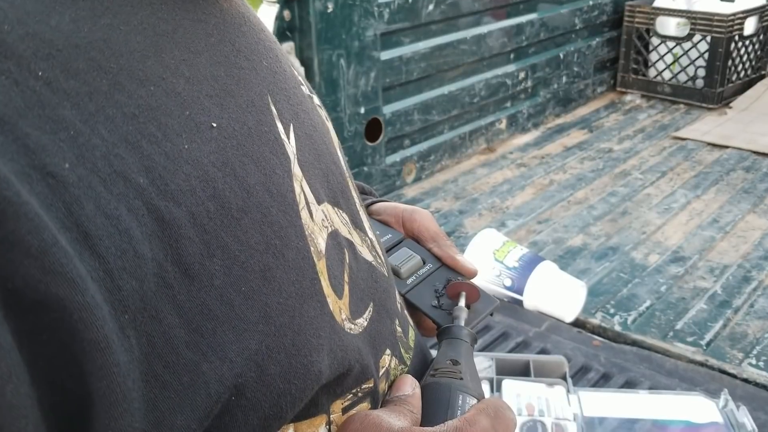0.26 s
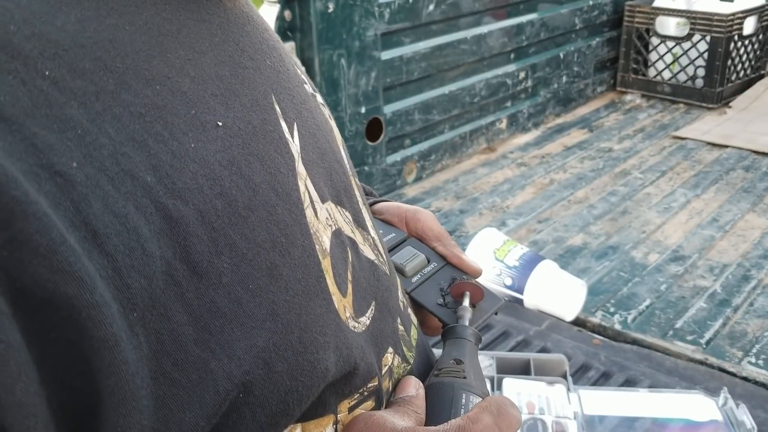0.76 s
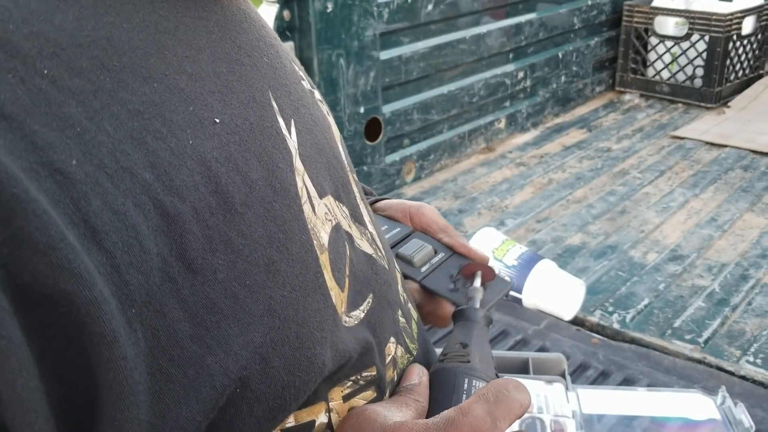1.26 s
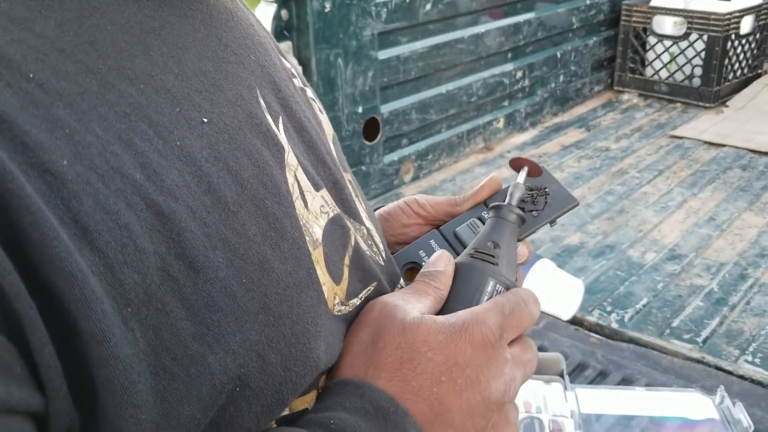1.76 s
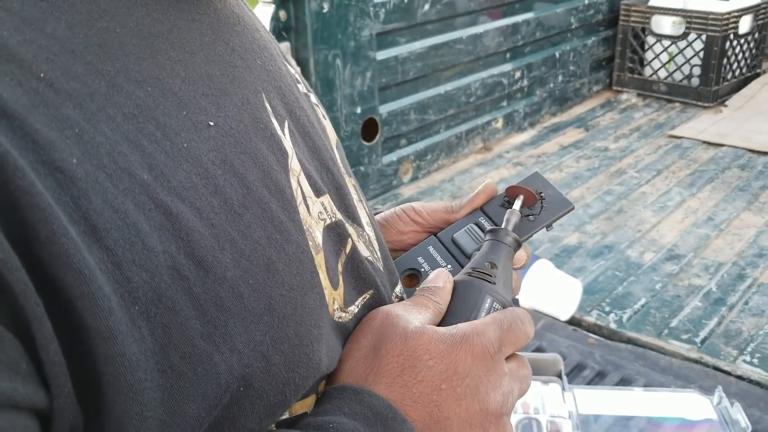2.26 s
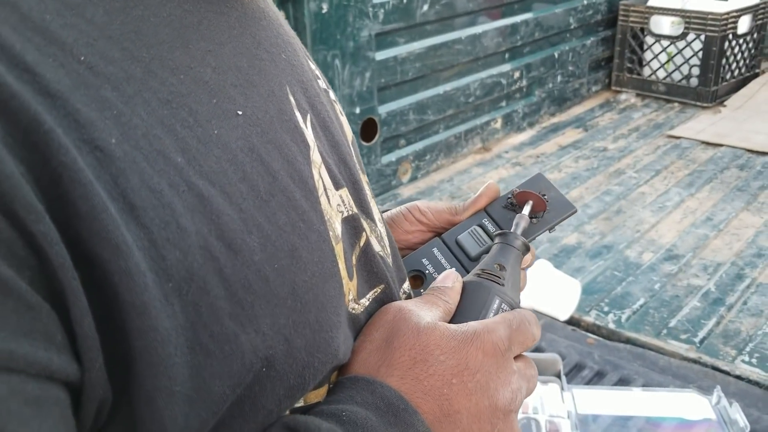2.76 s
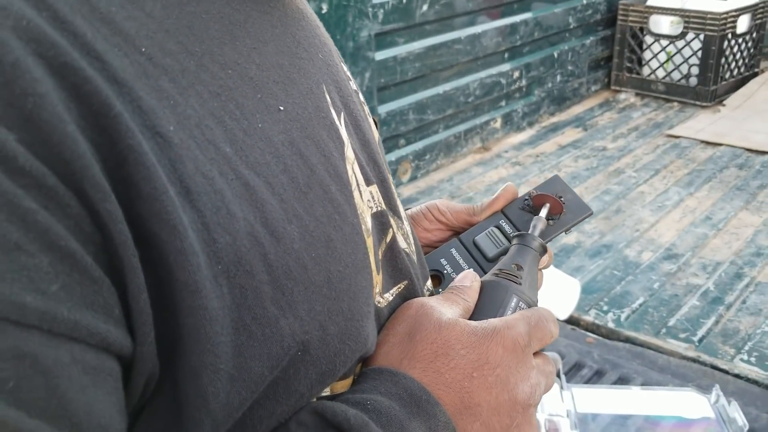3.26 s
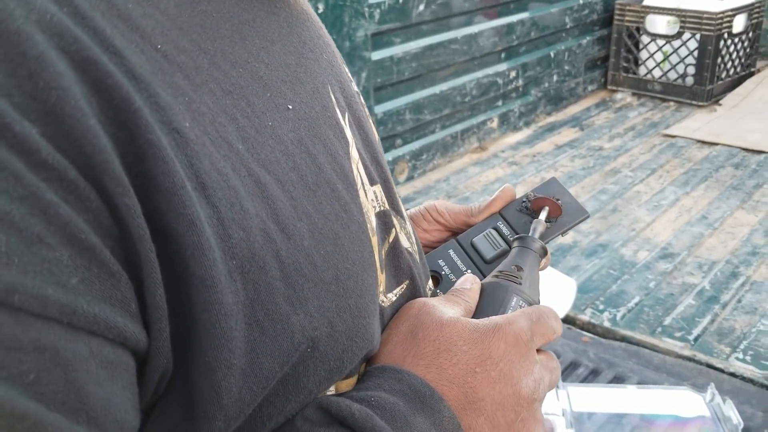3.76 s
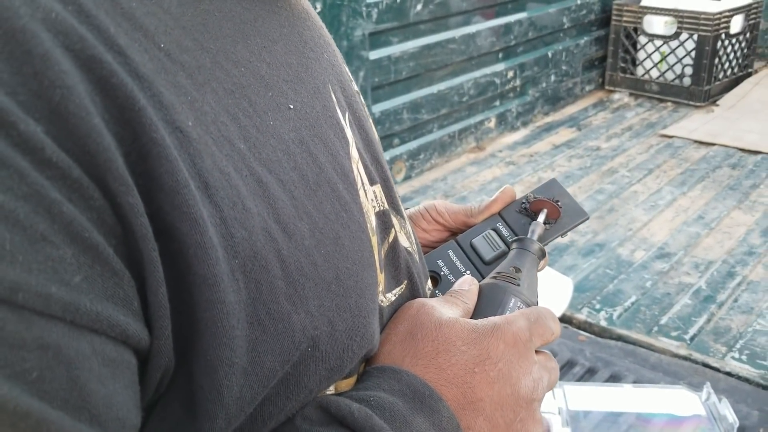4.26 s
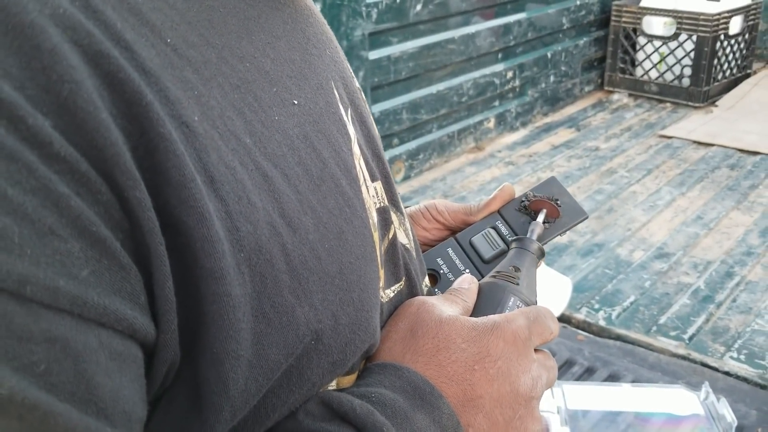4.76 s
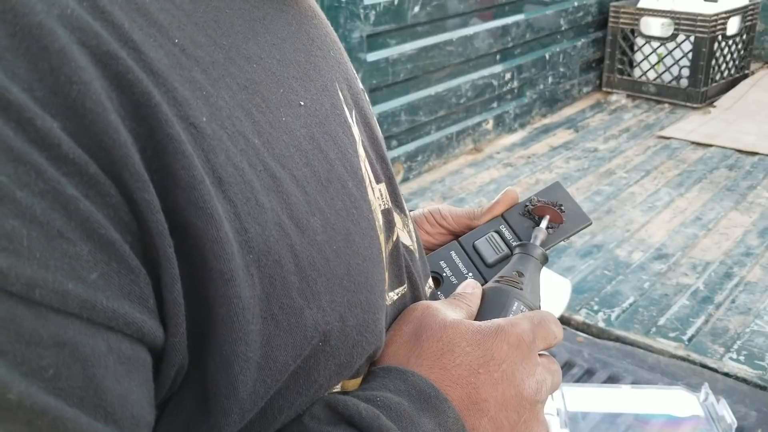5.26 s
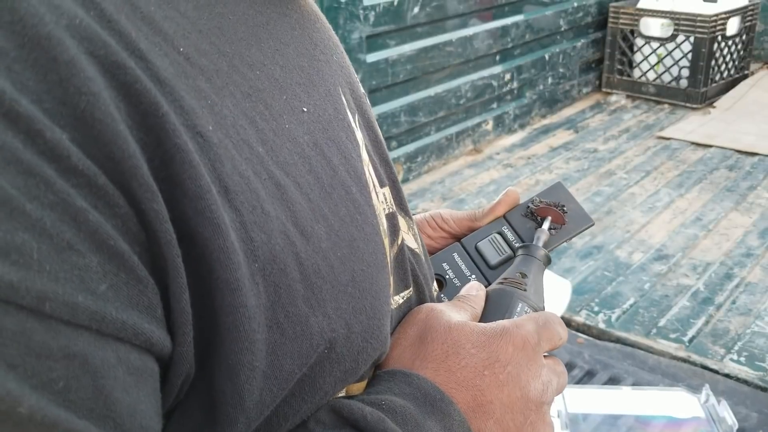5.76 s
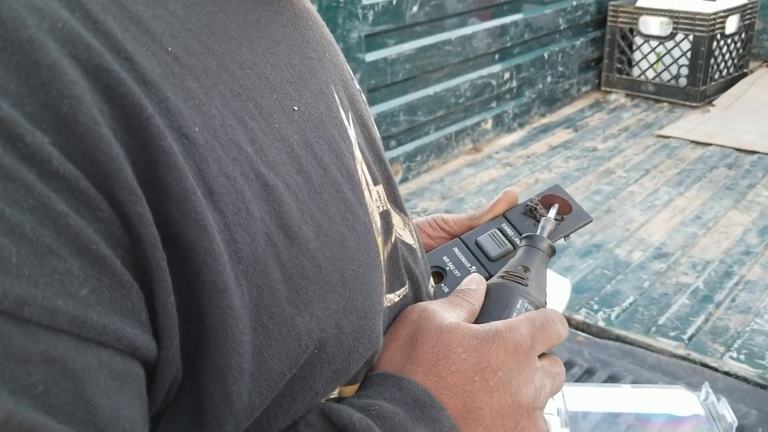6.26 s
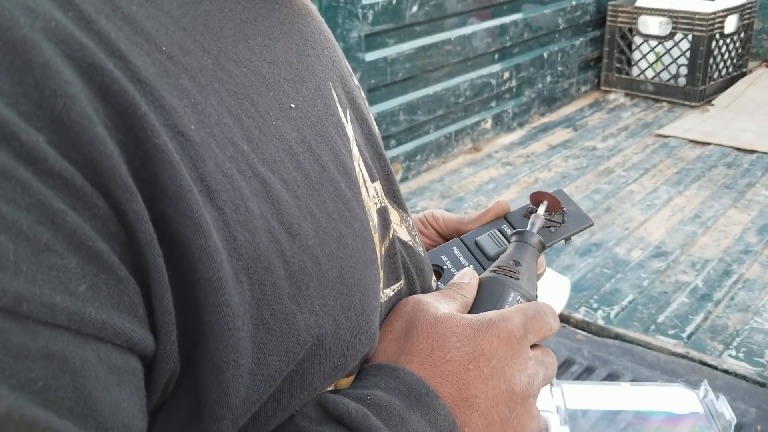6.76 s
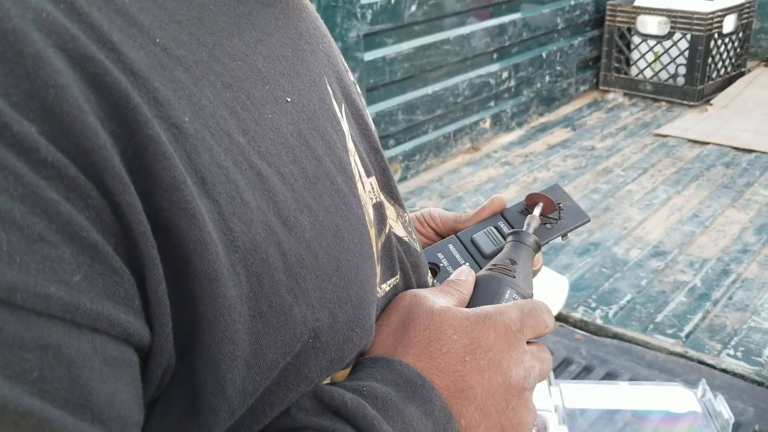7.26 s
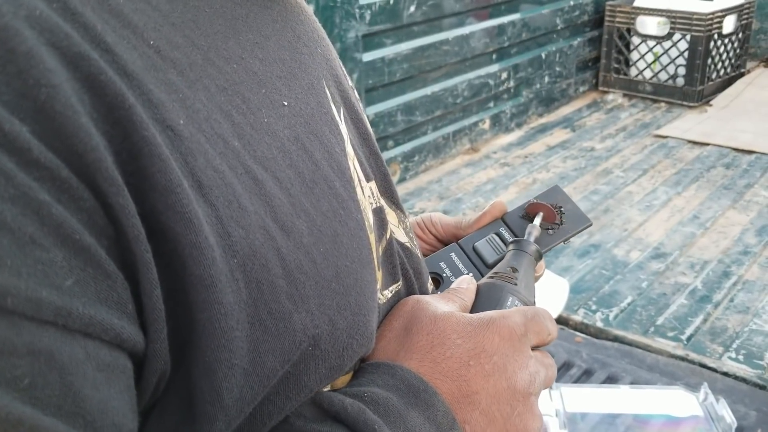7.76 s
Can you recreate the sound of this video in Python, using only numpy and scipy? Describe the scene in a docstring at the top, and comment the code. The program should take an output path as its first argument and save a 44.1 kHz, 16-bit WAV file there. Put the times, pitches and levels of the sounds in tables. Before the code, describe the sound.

Close high-speed rotary tool buzzing and grinding into a plastic case, pitch sagging under load and rising when freed, faint traffic behind.

```python
"""A rotary tool whines and hisses, rasps through a plastic case in three cuts and runs free between them.
Load drags the mains-driven shaft down; its orders sweep housing resonances, throbbing with motor current.
The cut-off wheel's grit scrapes case and wheel into ringing; its high spots knock once a turn.
The air is noise that grows with speed; outdoors, by a truck bed, traffic rumbles and drones faintly."""
import sys
import numpy as np
from scipy import signal
from scipy.fft import rfft, irfft, next_fast_len
from scipy.io import wavfile
from scipy.ndimage import uniform_filter1d

SR = 44100
rng = np.random.default_rng(int(sys.argv[2]) if len(sys.argv) > 2 else 0)


def pcm_store(signal):
    """Save signal as 16-bit PCM."""
    levels = np.round(np.clip(np.atleast_2d(signal), -1, 1) * 32767)
    wavfile.write(sys.argv[1], SR, levels.astype(np.int16).T)


N = 352800

RIPPLE_HZ = 119.9  # motor current pulses at twice the mains frequency
IDLE_HZ = 431.9  # shaft speed that the freed tool creeps up to
# cuts: touch t/s, lift t/s, time to bite/s, overtone trim/dB, overtone fade/(dB/s), whirr ceiling/dB
CUTS = [(-0.05, 1.21, .02, 6.5, -7, -12), (2.367, 6.065, 0.017, 1.5, -0.8, -1.8),
        (7.324, 8.1, 0.086, -2, 0, 0)]


def amp(db):
    """Amplitude factor of a level in dB."""
    return 10 ** (np.asarray(db) / 20)


def evened(x):
    """Scales to rms 1."""
    return x / np.sqrt(np.mean(x ** 2) + 1e-20)


def curves(rows):
    """Columns of a time table at every sample."""
    s, *columns = np.transpose(rows)
    return [np.interp(np.arange(N) / SR, s, c) for c in columns]


def bumps(rows):
    """Sum of bell-shaped changes in dB; rows are t/s, 1/e half-length/s, level/dB."""
    t = np.arange(N) / SR
    return sum(db * np.exp(-((t - s) / half) ** 2) for s, half, db in rows)


def read(points, hz):
    """Table value at hz, interpolated over log frequency."""
    f, value = np.transpose(points)
    return np.interp(np.log(hz + 1), np.log(f + 1), value)


def shaped(x, gain):
    """Applies a gain given as a function of frequency."""
    size = next_fast_len(N + 4096)
    return irfft(rfft(x, size) * gain(np.fft.rfftfreq(size, 1 / SR)), size)[:N]


def response(modes, hz, base_db=-80):
    """Magnitude of a set of resonances, powers summed over a floor."""
    power = sum(amp(db) ** 2 / (1 + (2 * (hz - f) / width) ** 2) for f, width, db in modes)
    return np.sqrt(amp(base_db) ** 2 + power)


def ring(x, modes, order=1):
    """Drives resonances; neighbours swing in opposite senses; order 2 has steeper skirts."""
    def gain(hz):
        return sum((-1) ** k * amp(db) / (1 + 2j * (hz - f) / width) ** order
                   for k, (f, width, db) in enumerate(modes))

    hz = np.arange(1, SR // 2, 5.)
    return shaped(x, gain) / np.sqrt(np.mean(abs(gain(hz)) ** 2))


def drift(per_s):
    """Slow chance with per_s knots a second, rms about 1.4."""
    knots = rng.standard_normal(round(N / SR * per_s) + 2)
    return np.interp(np.arange(N) / SR * per_s, np.arange(len(knots)), knots) * 1.76


def tone(turns, db, start=None):
    """Sinusoid of rms level db; phases are in turns, the start random unless given."""
    start = rng.random() if start is None else start
    return np.sqrt(2) * amp(db) * np.cos(2 * np.pi * (turns + start))


def speed():
    """Shaft speed in Hz: loaded, then run-up after each lift; rotor inertia rounds each change."""
    # under load: t/s, shaft speed/Hz
    loaded = [(0, 418.3), (0.2, 391.8), (0.4, 352), (0.5, 336.8), (0.6, 330), (0.7, 312.6), (1.0, 284),
              (1.1, 284.3), (1.149, 278.7), (1.201, 286.4), (2.5, 425.5), (2.6, 415.6), (2.8, 365.2),
              (2.9, 330.2), (3.0, 299.4), (3.066, 284.6), (3.146, 268.3), (3.195, 256.6), (3.235, 254.7),
              (3.258, 246.4), (3.326, 237.9), (3.38, 234.6), (3.42, 226.3), (3.444, 224.6), (3.632, 199),
              (3.698, 191.6), (3.754, 181), (3.816, 176.9), (3.9, 174.5), (3.986, 181.9), (4.086, 191.3),
              (4.184, 190.9), (4.27, 196.2), (4.32, 197.9), (4.44, 205), (4.55, 205), (4.625, 196.3),
              (4.674, 200.1), (4.712, 201), (4.782, 205.4), (4.876, 215.7), (4.932, 219.3), (5.0, 227.2),
              (5.1, 237.6), (5.26, 240.7), (5.33, 246), (5.45, 259), (5.52, 261.4), (5.7, 285.6),
              (5.8, 294), (5.9, 288.5), (6.001, 295.7), (6.05, 304.3), (7.4, 420.3), (7.49, 414.2),
              (7.6, 396.6), (7.7, 377), (7.8, 364.3), (8.0, 352.3)]
    leap_share, leap_s, creep_s = .09, .05, .375  # freed, the shaft leaps, then creeps
    rows, (s, hz) = list(loaded), np.transpose(loaded)
    for (_, lift, *_), (touch, *_) in zip(CUTS, CUTS[1:]):
        last = np.searchsorted(s, lift) - 1
        u = np.arange(.025, touch - s[last], .025)
        gap = leap_share * np.exp(-u / leap_s) + (1 - leap_share) * np.exp(-u / creep_s)
        rows += zip(s[last] + u, IDLE_HZ - (IDLE_HZ - hz[last]) * gap)
    return uniform_filter1d(curves(sorted(rows))[0], size=700)


def contact(hz):
    """Levels in dB of body, wall, wheel, overtones, knocks and whirr: the cut replaces idle shaking."""
    # drive in the cut: t/s, case body/dB, wheel knock/dB, case wall/dB, wheel ring/dB
    press = [(0, -29, -33, -25.5, -31), (0.12, -28.5, -33.5, -26, -34.5), (0.22, -27, -48, -25, -28.5),
             (0.35, -29, -38.5, -24, -31.5), (0.55, -28.5, -35, -24, -33), (0.7, -28, -56, -26, -31.5),
             (0.9, -29, -57, -27, -39), (1.0, -32.5, -56, -30, -39), (1.12, -31, -54, -31, -45),
             (1.18, -36, -62, -37.5, -45), (2.38, -34, -40, -33.5, -42), (2.5, -31, -33, -31, -44),
             (2.6, -32, -31, -29, -43), (2.7, -31.5, -28, -30, -42.5), (2.8, -31, -31, -33.5, -45),
             (2.92, -29.5, -31.5, -30.5, -42.5), (3.1, -29.5, -31.5, -32, -46),
             (3.21, -34, -30.5, -30.5, -41), (3.245, -30, -35.5, -33.5, -44),
             (3.27, -32, -29.5, -34.5, -44), (3.37, -35, -32.5, -34, -39), (3.41, -33, -37, -38, -48),
             (3.55, -34.5, -38.5, -36.5, -47), (3.72, -41.5, -42.5, -37, -43.5),
             (3.85, -36, -45, -37.5, -45.5), (4.08, -36, -38.5, -36, -45), (4.3, -35, -38, -36.5, -44.5),
             (4.45, -34, -37, -32, -41), (4.57, -36.5, -36.5, -32.5, -43), (4.625, -36.5, -44, -33.5, -44),
             (4.68, -37, -42, -35, -40.5), (4.79, -33.5, -43.5, -35, -43), (4.9, -31.5, -39.5, -34, -44.5),
             (4.96, -36, -44, -38.5, -47), (5.2, -40.5, -43.5, -35, -43), (5.42, -44, -45.5, -37.5, -42.5),
             (5.62, -51, -47, -42.5, -50), (5.8, -37, -41.5, -40.5, -44.5), (6.05, -46, -56.5, -45.5, -51),
             (7.35, -52, -55, -37, -47), (7.45, -46, -43, -34.5, -48), (7.55, -52, -54, -39.5, -58),
             (7.62, -40, -54, -40, -42.5), (7.69, -35, -52, -40, -43), (7.73, -39, -41, -41, -45),
             (7.8, -40, -40, -38.5, -43), (7.9, -39, -37, -36, -48), (8.0, -42, -43, -37, -48)]
    # the wheel snags briefly: t/s, body change/dB, rasp change/dB
    snags = [(2.385, 2, 1), (2.53, 0, -0.5), (2.7, 4.5, 3), (2.77, -1, 1.5), (4.4, 0, 0), (4.6, 2, 2.5),
             (4.7, 4, 2), (4.87, 1.5, 1.5), (7.44, -3, 1)]
    # plastic damps the bearings' whirr: shaft f/Hz, running free/dB, cutting/dB
    whirr_by_speed = [(190, -30, -31), (240, -17, -16.5), (304, -16, -16.5), (337, -10, -20),
                      (361, -7.5, -10), (373, -3.5, -14.5), (396, -2, -9), (409.5, -0.7, -6.5),
                      (435, -0.5, -3)]
    # the whirr sinks as the wheel digs in: t/s, 1/e half-length/s, change/dB
    whirr_dip = [(7.66, 0.079, -7), (7.9, .15, -2.5)]
    # shaking of the free tool at idle speed: body, wall, wheel, overtones, knocks [level/dB]
    idle_db = (-39.5, -37, -48, -64, -63)
    idle_db_per_hz, top_db_per_hz = 0.13, .012
    top_follow, top_follow_from_db = 0.45, -42  # overtones take a share of the ring's swing about this level
    snag_s, lift_s = 0.032, 0.015
    parting_db, parting_s = 6.5, 0.0089  # the wall chirps as the wheel leaves it

    t = np.arange(N) / SR
    body_db, knock_db, wall_db, wheel_db = curves(press)
    low_db, high_db = (bumps((row[0], snag_s, row[k]) for row in snags) for k in (1, 2))
    free_db, damped_db = (read([(row[0], row[k]) for row in whirr_by_speed], hz) for k in (1, 2))
    idle = amp(np.array(idle_db)[:, None] + idle_db_per_hz * (hz - IDLE_HZ)) ** 2
    power, whirr_db = idle, free_db
    overtones_db = top_follow * wheel_db + (1 - top_follow) * top_follow_from_db
    overtones_db = overtones_db + top_db_per_hz * (hz - IDLE_HZ) + high_db
    for touch, lift, bite, top_db, top_fade, ceiling_db in CUTS:
        on = np.clip(np.minimum((t - touch) / bite, 1 - (t - lift) / lift_s), 0, 1)
        age = np.clip(t - touch, 0, lift - touch)
        levels = np.array([body_db + low_db,
                           wall_db + high_db + bumps([(lift, parting_s, parting_db)]),
                           wheel_db + high_db,
                           overtones_db + top_db + top_fade * age,
                           knock_db])
        power = power + on ** 2 * (amp(levels) ** 2 - idle)
        whirr_db = whirr_db + on * (np.minimum(damped_db, ceiling_db) - free_db)
    return (*10 * np.log10(power), whirr_db + bumps(whirr_dip))


def motor(hz, turns, ripple, whirr_db):
    """Shaft orders; the pulsing current puts sidebands one ripple above and below them."""
    # bearing whirr: shaft order, lower sideband/dB, order/dB, upper sideband/dB (relative)
    whirr = [(2, -48.5, -57, -38), (3, -44, -26, -39), (4, -29, -28.5, -43), (5, -31, -32.5, -41),
             (6, -33, -31.5, -31.5), (7, -28, -31.5, -34), (8, -31, -33, -38), (9, -38, -30.5, -39.5),
             (12, -56, -46, -45), (13, -50, -42, -44), (14, -46, -43, -50), (15, -42, -44, -48),
             (16, -46, -39, -48)]
    # resonances: f/Hz, width/Hz, level/dB
    housing = [(1243, 236, -5.5), (1870, 290, -19), (2640, 510, -8)]
    stator = [(2377, 120, 0)]
    # t/s, slot force/dB
    slot = [(0, -15), (0.55, -18), (0.7, -14.5), (0.9, -12), (1.03, -13), (1.15, -16.5), (1.21, -16.5),
            (1.3, -22.5), (1.5, -13.5), (2.9, -17), (2.96, -17.5), (3.12, -16), (3.25, -21), (3.4, -12),
            (3.75, -38), (4.0, -19), (4.75, -30), (4.95, -15), (5.4, -16), (5.6, -20), (5.8, -17),
            (6.05, -16), (6.15, -18.5), (6.4, -28), (7.3, -28), (7.7, -24), (8, -18)]
    # shaft f/Hz, unbalance level/dB
    unbalance = [(175, -58), (205, -53), (240, -45), (285, -42), (310, -38), (340, -40.5), (425, -38)]
    # swells and dips: t/s, 1/e half-length/s, change/dB
    pressed_unbalance = [(0.25, 0.3, 4), (3.15, 0.31, 9), (7.55, 0.22, -4)]
    fan_dips = [(1.46, 0.026, -10), (1.75, 0.099, -10), (5.7, .35, -7), (6.45, .11, -12), (7.62, .08, -16),
                (7.9, .15, 0)]
    second_slot_tone = [(3.4, .3, -3), (5.2, .2, 2)]
    third_slot_tone = [(1.34, .08, 13), (3.82, 0.14, -9), (4.1, .12, 5), (6.15, .05, 8)]
    # windings under load: f/Hz, level/dB
    hum = [(240, -52.5), (360, -54)]

    unbalance_db = read(unbalance, hz) + bumps(pressed_unbalance)
    out = tone(turns, unbalance_db + 0.5 * drift(40))

    # eighteen fan blades, muffled in the cut
    fan_db = np.minimum(1.7 * (whirr_db + 12), 0) - 43 + bumps(fan_dips)
    out += tone(18 * turns, fan_db + 1.5 * drift(20))

    # eight rotor slots pass the poles each turn, in step with the current
    slot_db, = curves(slot)
    for side, db in zip((-1, 0, 1), (-13.0, -4, -6.5)):
        gain = response(stator, 8 * hz + side * RIPPLE_HZ, -51)
        out += gain * tone(8 * turns + side * ripple, slot_db + db + 1.23 * drift(30), start=0)

    for order, *levels in whirr:
        for side, db in zip((-1, 0, 1), levels):
            gain = response(housing, order * hz + side * RIPPLE_HZ, -13.5)
            out += gain * tone(order * turns + side * ripple, whirr_db + db + 0.98 * drift(10))

    # current rises as the shaft slows: more hum, sharper slot pulses
    load = np.clip((330 - hz) / 90, 0, 1)
    second = tone(16 * turns, -46 + bumps(second_slot_tone) + 2.5 * drift(12))
    second += tone(16 * turns + ripple, -51 + 2.5 * drift(12))
    out += np.clip((280 - hz) / 35, 0, 1) * second
    third_db = -62 + 14 * np.clip((215 - hz) / 20, 0, 1) + bumps(third_slot_tone)
    out += tone(24 * turns, third_db + 2.5 * drift(14))
    return out + load * sum(tone(f / RIPPLE_HZ * ripple, db) for f, db in hum)


def air(hz, turns, ripple):
    """Cooling air and brush hiss: noise that grows with speed, ruffled by current and rotation."""
    # spectrum: f/Hz, relative density/dB
    spectrum = [(150, -43), (360, -20.5), (550, -18), (1000, -11), (1350, -13), (2100, -15.5), (2650, -10),
                (3300, -17.5), (4200, -21.5), (6100, -21.5), (8700, -26), (10200, -25), (13600, -30.5),
                (15600, -40)]
    ruffle = (1 + 0.12 * np.cos(2 * np.pi * ripple)) * (1 + 0.23 * np.cos(2 * np.pi * turns))
    noise = ruffle * amp(0.5 * drift(25)) * rng.standard_normal(N)
    hiss = shaped(noise, lambda f: amp(read(spectrum, f)))
    return amp(-33 + 29.4 * np.log10(hz / 425)) * evened(hiss)


def chatter(turns):
    """The wheel bounces, biting harder every few turns: swing of the bite, and thuds."""
    # start t/s, end t/s, bounces per turn, thud level/dB, scraping depth/(0-1)
    bouts = [(0, 0.35, 0.49, -54, 0.25), (0.364, 0.63, .5, -69, 0.24), (2.381, 2.657, 0.53, -73, 0.15),
             (2.66, 2.807, 0.5, -49.5, 0.46), (4.202, 4.851, 2 / 3, -55, 0)]
    t, swing, thuds = np.arange(N) / SR, np.zeros(N), np.zeros(N)
    for start, end, ratio, db, depth in bouts:
        on = np.clip(np.minimum(t - start, end - t) / 0.024, 0, 1)
        swing += on * depth * np.cos(2 * np.pi * ratio * turns)
        thuds += on * tone(ratio * turns, db + 2.0 * drift(20))
    return swing, thuds


def rim(turns, memory=0.91):
    """The rim's grit pattern comes round every turn and wears into a new one over some turns."""
    steps = 240  # grit points round the rim
    fresh = rng.standard_normal((int(turns[-1]) + 62, steps))
    grit = signal.lfilter([1], [1, -memory], fresh, axis=0)[60:]
    high_spot = np.exp(-np.arange(steps) / 35)  # the wheel runs out of true: one arc bites most
    pattern = (grit * (0.66 + high_spot)).ravel()
    return evened(np.interp(turns * steps, np.arange(grit.size), pattern))


def uneven(x):
    """The cut wanders over the case, so its resonances ring in patches."""
    # treble parts that ring out a while: t/s, 1/e half-length/s, f/Hz, 1/e half-width/Hz, gain/dB
    ring_outs = [(.1, .15, 12400, 598, 8), (.5, 0.28, 10100, 600, 4.5), (1.14, .05, 8604, 600, 13),
                 (1.45, 0.15, 3950, 300, 13.5), (1.8, 0.24, 6594, 300, 9), (2.4, .03, 11100, 1400, 3),
                 (2.52, .03, 11300, 800, 10), (2.702, 0.11, 7000, 400.2, 10), (2.73, .05, 11600, 800, 6),
                 (4.849, .06, 8490, 700, 6), (5.4, .12, 11230, 499.8, 7), (5.55, 0.078, 8500, 299.5, 7),
                 (7.65, .05, 10600, 799.6, 6), (7.801, 0.059, 10690, 699, 9)]
    patchy_db = 1.22
    hz, t, z = signal.stft(x, SR, nperseg=512)
    patches = rng.standard_normal(z.shape[::-1]).T
    patches = evened(uniform_filter1d(uniform_filter1d(patches, size=7, axis=0), size=14, axis=1))
    gain_db = patchy_db * patches
    for s, half, f, width, db in ring_outs:
        gain_db += db * np.outer(np.exp(-((hz - f) / width) ** 2), np.exp(-((t - s) / half) ** 2))
    return signal.istft(z * amp(gain_db), SR, nperseg=512)[1][:N]


def cutting(turns, ripple, bounce, body_db, wall_db, wheel_db, top_db):
    """Scraping force rings the resonances of case and wheel."""
    # repeating power share of the scraping: t/s, wall and wheel base share/(0-1), body share/(0-1)
    repeating = [(0, 0.4, .3), (0.55, 0.55, .45), (0.8, .35, .25), (1.2, 0.3, .2), (2.45, 0.44, .4),
                 (2.75, .2, .35), (3.3, 0.53, .4), (4.6, 0.6, .35), (5.3, .7, .45), (6, 0.85, .2),
                 (8, .99, .3)]
    # resonances: f/Hz, width/Hz, relative level/dB
    body = [(457, 240, -15.5), (943, 250, -4.5), (1172, 128, -0.5), (1434, 143, 2), (1786, 210, 0.5),
            (2392, 95, 2), (2840, 157, -2.5)]
    wall_first_grip = [(3804, 364, 4), (4233, 400, 2.5), (5620, 370, -2.5), (6620, 204, 0),
                       (7480, 164, -2.5), (8300, 160, -9)]
    wall_second_grip = [(3222, 136, 3), (3774, 490, -0.5), (4860, 510, -1.5), (5640, 170, 0.5),
                        (6203, 220, 2.5), (7090, 410, -4.5), (8300, 550, -6)]
    wheel = [(9130, 660, 1), (10125, 480, 8.5), (10880, 630, 1.5)]
    wheel_top = [(11560, 1330, 2), (13050, 820, -3), (14100, 1600, -6.5)]
    regrip_s = 1.8

    share, body_share = curves(repeating)
    t = np.arange(N) / SR
    bite = bounce * (1 + 0.082 * np.cos(2 * np.pi * ripple))
    grit = rim(turns)

    def force(db, repeat):
        """Grit that comes round again, mixed with freshly torn chips."""
        chips = evened((0.5 + np.exp(-(turns % 1) / 0.27)) * rng.standard_normal(N))
        repeat = np.clip(repeat, 0, 1)
        mix = np.sqrt(repeat) * grit + np.sqrt(1 - repeat) * chips
        return bite * amp(db + 0.52 * drift(35)) * mix

    wall_force = force(wall_db, share + .03)
    wheel_share = .55 + .4 * share  # the wheel itself feels mostly its own rim
    rasp = ring(wall_force * (t < regrip_s), wall_first_grip)
    rasp += ring(wall_force * (t >= regrip_s), wall_second_grip)
    rasp += ring(force(wheel_db, wheel_share), wheel, order=2)
    rasp += ring(force(top_db, wheel_share), wheel_top, order=2)
    return ring(force(body_db, body_share), body) + uneven(rasp)


def knocks(hz, turns, ripple, swing, knock_db):
    """High spots strike every turn: clean shaft orders through steep resonances of case and housing."""
    # rim shape: shaft order, level/dB
    lobes = [(2, 2.5), (3, -1), (4, 0.5), (5, -1), (6, 0), (7, 0.5), (8, -2.5), (9, 0.5), (10, -13),
             (11, -17), (12, 0), (13, -1), (14, 4), (15, 3)]
    # resonances on the way, then with the case held anew: f/Hz, width/Hz, level/dB
    path = [(396, 69, -12), (940, 216, -2), (1217, 260, -1.5), (1525, 280, 0), (1795, 210, 0.5),
            (2444, 350, -4.5), (2930, 490, -28)]
    path_last_grip = [(700, 300, -14), (1450, 290, 2.5), (1850, 310, 1.5), (2700, 910, -1)]
    # every third order stands out: t/s, lift/dB (the other orders get its negative)
    three_spots = [(0, 0.5), (3.5, 0.5), (3.62, 1.5), (3.8, 0), (4.1, 2), (4.3, 1.5), (4.58, 2.5),
                   (4.64, -3.5), (4.95, -2), (5.25, 0), (5.4, 3), (6.05, 2), (6.3, -2), (8, -1)]
    # motor current throbs in the knocks: t/s, depth/(0-1)
    throb = [(0, .2), (2.5, .2), (3.1, .3), (3.4, .45), (3.8, .25), (6, .2), (7.6, .5), (8, .5)]
    last_grip_s, bounce_factor = 7, 2  # knocks feel the bouncing more than the scraping does

    def steep(modes, f):
        return np.sqrt(sum(amp(db) ** 2 / (1 + (2 * (f - c) / width) ** 2) ** 2 for c, width, db in modes))

    cut = round(last_grip_s * SR)
    three_db, = curves(three_spots)
    out = np.zeros(N)
    for order, db in lobes:
        f = order * hz
        gain = np.r_[steep(path, f[:cut]), steep(path_last_grip, f[cut:])]
        sign = -1 if order % 3 else 1
        out += gain * tone(order * turns, knock_db + db + sign * three_db + 1.53 * drift(14))
    pulse = 1 + curves(throb)[0] * np.cos(2 * np.pi * ripple)
    return (1 + bounce_factor * swing) * pulse * out


def outdoors():
    """Far traffic: shaped noise with a few wavering drones, nearly alike in both channels."""
    # f/Hz, relative density/dB
    rumble = [(12, -64), (20, -27), (81, -9), (145, -16), (165, -12), (238, -5.5), (264, -8.5), (304, -2),
              (330, -5), (430, -10), (730, -120)]
    # faint low drones: f/Hz, level/dB
    drones = [(88, -63.5), (108, -66.5), (140, -64.5)]
    rumble_db = -50.5
    t = np.arange(N) / SR
    one, other = (evened(shaped(rng.standard_normal(N), lambda f: amp(read(rumble, f)))) for _ in range(2))
    mid = amp(rumble_db) * one
    mid += sum(tone(f * t + 0.091 * drift(5.3), db + 2.15 * drift(5.9)) for f, db in drones)
    return mid + amp(rumble_db - 14.0) * other * np.array([[1], [-1]])


def placed(x, echo_db, lag_s=3e-5):
    """Reflections off torso and truck walls differ at the two microphones and shift as the hands move."""
    # f/Hz, echo gain in the side signal/dB
    sides = [(60, -14), (200, -20), (400, -11), (700, -9.5), (1300, -8.5), (2400, -1), (4400, 1.5),
             (8100, 0.5), (15000, -1.5)]
    # f/Hz, left minus right of the direct sound/dB
    lean = [(60, -2), (110, -2), (200, 0), (380, -1.5), (700, -1), (1290, 1.5), (2380, 1), (4400, -2),
            (8120, -2), (15000, 9)]
    taps = rng.standard_normal((2, 3000)) * np.exp(-np.arange(3000) / 600)
    near, far = (signal.oaconvolve(x, h / np.linalg.norm(h))[:N] for h in taps)
    pose = 1.36 * uniform_filter1d(drift(4), 4000)
    echoes = amp(echo_db) * (np.cos(pose) * near + np.sin(pose) * far)

    def direct_side(f):
        """Level lean, and a lag as left is a little farther."""
        lag = 1j * np.sin(np.pi * f * lag_s) / (1 + (f / 5000) ** 4)
        return np.tanh(read(lean, f) * np.log(10) / 40) - lag

    side = shaped(echoes, lambda f: amp(read(sides, f))) + shaped(x, direct_side)
    return np.array([x + side, x - side])


def scene():
    """Tool, cut and surroundings, all driven by one shaft and one current phase."""
    hz = speed()
    *cut_db, knock_db, whirr_db = contact(hz)
    turns, ripple = np.cumsum(hz) / SR, RIPPLE_HZ * np.arange(N) / SR
    swing, thuds = chatter(turns)
    tool = placed(motor(hz, turns, ripple, whirr_db), echo_db=-9)
    tool += placed(air(hz, turns, ripple), echo_db=0.0)
    cut = thuds + cutting(turns, ripple, 1 + swing, *cut_db)
    cut += knocks(hz, turns, ripple, swing, knock_db)
    return tool + placed(cut, echo_db=-2.5) + outdoors()


def record(dry):
    """Low-pass band limit at 15.72 kHz."""
    lowpass = signal.firwin(2047, 15720, window=("kaiser", 9), fs=SR)
    return signal.oaconvolve(dry, lowpass[None], "same")


dry = scene()
out = record(dry)
pcm_store(out)
```